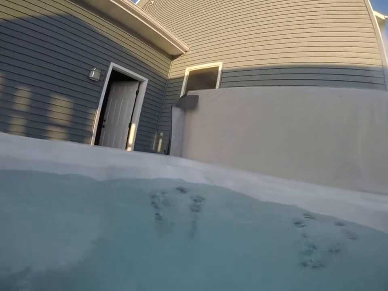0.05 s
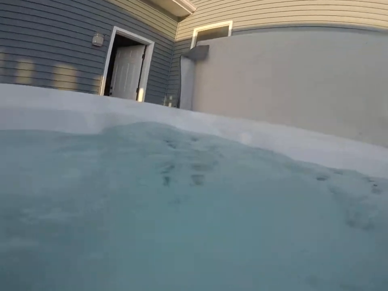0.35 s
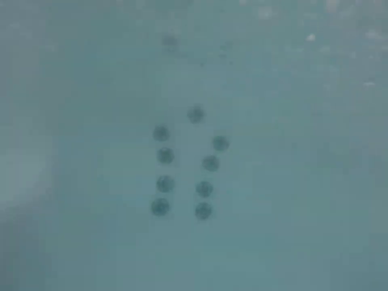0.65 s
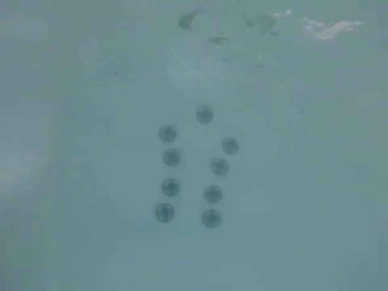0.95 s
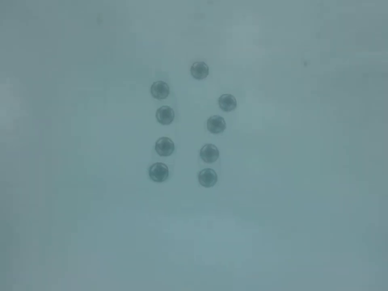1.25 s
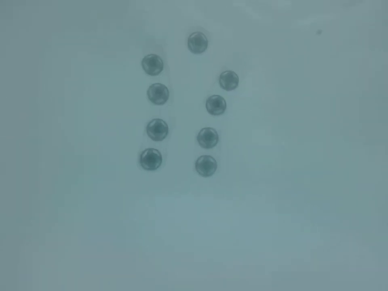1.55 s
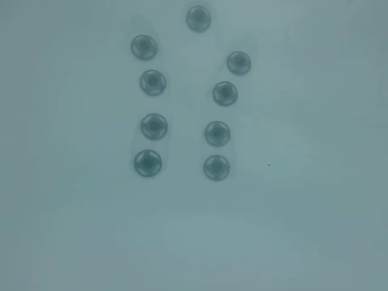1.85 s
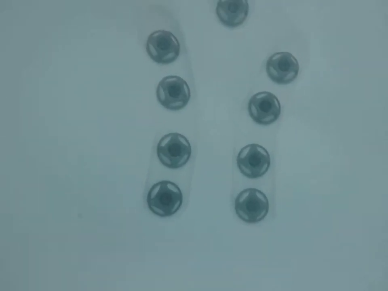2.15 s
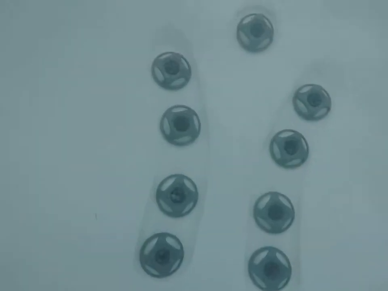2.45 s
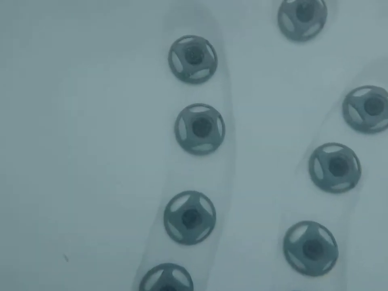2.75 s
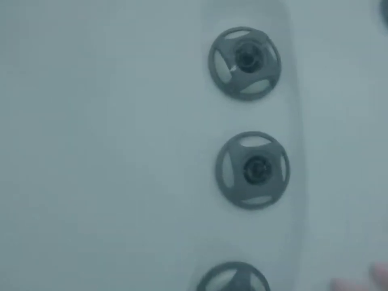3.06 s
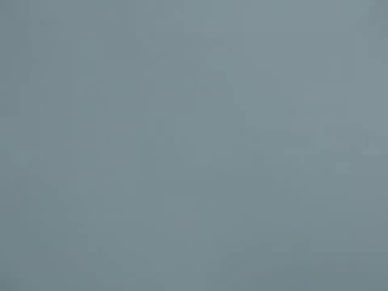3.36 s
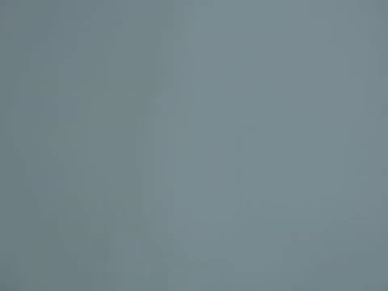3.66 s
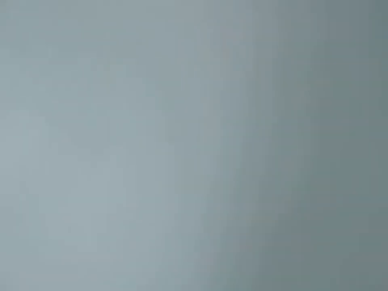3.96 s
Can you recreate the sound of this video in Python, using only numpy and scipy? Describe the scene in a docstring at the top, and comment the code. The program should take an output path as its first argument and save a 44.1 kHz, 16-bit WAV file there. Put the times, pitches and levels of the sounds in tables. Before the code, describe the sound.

A quick splash and bubbly knocks give way to a hot tub humming and rumbling underwater.

```python
"""A camera in a waterproof case dips into a hot tub. Over faint open air, jets and fizz come the first
ticks on the case, a low gulp and the pings of air bubbles breaking free. At 0.6 s the surface splashes
shut and the air is gone; drops and fingers knock and ping on the case among more bubbles. From about
1 s the pump hums through the water, and the jet rumble builds to the end as the camera nears the wall.
Fine fizz and a few last ringing clicks reach the microphone through the resonances of the case."""
import sys
import numpy as np
from scipy import signal
from scipy.fft import rfft, irfft, next_fast_len
from scipy.io import wavfile
from scipy.ndimage import uniform_filter1d, minimum_filter1d, map_coordinates

SR = 44100
rng = np.random.default_rng(int(sys.argv[2]) if len(sys.argv) > 2 else 0)


def dump_mix(stems):
    """Bounce the given channels to the path in sys.argv[1] as a 16-bit WAV at rate SR."""
    frames = np.atleast_2d(stems).T  # one column per channel
    limited = np.clip(frames, -1, 1)  # hard clip at full scale
    pcm = np.round(limited * 32767).astype(np.int16)
    wavfile.write(sys.argv[1], SR, pcm)


N = 176400
TOP_HZ = 16000

# EQ of the open air above the tub: f/Hz, gain/dB
AIR_EQ = [(150, -2.5), (400, -3), (1100, -9.5), (1800, -24), (2800, -8), (3600, -18), (4800, -13.5),
          (5600, -11.5), (8000, -23), (15000, -29.5)]

# fader ride of the jet rumble, before the trims: t/s, low level/dB, mid level/dB, high level/dB
JET_RIDE = [(0.0, -55.5, -70, -70), (0.43, -58.5, -78, -73.5), (0.86, -44.5, -68.5, -61.5),
            (1.15, -40.5, -55.5, -57), (1.63, -33.5, -54, -54), (1.97, -28, -45.5, -56.5),
            (2.18, -31.5, -50, -58), (2.48, -31, -50.5, -58), (3.19, -24.5, -38.5, -51.5),
            (3.34, -21, -37, -46), (3.59, -22.5, -34.5, -44), (4.0, -22.5, -30.5, -41)]
# trims of the low, mid and high rumble: gain/dB
JET_TRIMS = [-6.5, 3.5, -1]
# EQ of the low rumble: f/Hz, gain/dB
JET_LOW_EQ = [(30, -28), (65, -6), (100, 0), (150, -1), (200, -1), (250, -4.5), (310, -23), (500, -75.5)]
# EQ of the mid rumble: f/Hz, gain/dB
JET_MID_EQ = [(170, -47), (250, -12.5), (290, 0.5), (355, -2), (400, -9), (470, -20.5), (800, -69.5)]
# EQ of the high rumble: f/Hz, gain/dB
JET_HIGH_EQ = [(280, -32), (420, -0.5), (680, -0.5), (780, -9), (1100, -17), (1600, -33), (4000, -72)]
# ride of the water pushing on the case: t/s, level/dB
SWAY_RIDE = [(0.0, -51), (0.22, -38), (0.27, -50.5), (0.6, -38.5), (0.7, -48), (1.36, -49), (1.39, -35.5),
             (2.75, -50.5), (3.26, -42), (4.0, -40.5)]
# EQ of that push: f/Hz, gain/dB
SWAY_EQ = [(10, 2.5), (25, 4), (50, 0.5), (75, -5.5), (130, -29), (400, -64)]

# ride of the fizz, before the trims: t/s, body level/dB, hiss level/dB
FIZZ_RIDE = [(0.0, -63, -73), (0.34, -63, -70.5), (0.52, -57.5, -69), (0.66, -58.5, -77.5),
             (0.91, -51.5, -67.5), (1.06, -51, -70), (1.26, -51, -68), (1.68, -43.5, -61.5),
             (2.14, -45.5, -61), (3.11, -49.5, -61), (3.42, -52, -59.5), (4.0, -44.5, -57.5)]
BODY_TRIM_DB, HISS_TRIM_DB = -0.5, -1
# EQ of the midrange body of the fizz: f/Hz, gain/dB
BODY_EQ = [(600, -7), (1000, -6.5), (1400, -5.5), (1650, -0.5), (1850, -2.5), (2100, -0.5), (2500, -4.5),
           (2900, -9), (3400, -16), (4200, -21), (7000, -59)]
# EQ of the hiss on top: f/Hz, gain/dB
HISS_EQ = [(2400, -27), (3500, 5.5), (4350, -3.5), (4750, -1), (5900, -10.5), (6400, -12.5), (8400, -13.5),
           (10000, -19), (13000, -25.5), (16000, -35)]
# high case resonances in the hiss: f/Hz, width/Hz, level relative to the hiss/dB
HISS_RINGS = [(4360, 110, -7.5), (5530, 410, -6), (6320, 310, -12.5)]

# drops and fingers striking the case: t/s, level/dB, lowest excited f/Hz, highest excited f/Hz
KNOCKS = [(0.175, -37.5, 2500, 11700), (0.473, -38.5, 5030, 9800), (0.5673, -18, 1950, 13100),
          (0.5706, -8.5, 2200, 6770), (0.5801, -17, 513, 3000), (0.5754, -18.5, 6000, 13000),
          (0.5845, -21, 6000, 13000), (0.5915, -19.5, 5500, 9000), (.602, -28.5, 4020, 13800),
          (0.627, -28.5, 4400, 13060), (0.6392, -27.5, 2500, 5370), (.6672, -48, 4500, 9900),
          (.692, -41.5, 2200, 6960), (0.8373, -25, 900, 2550), (0.8898, -9.5, 4340, 7510),
          (0.9069, -3, 1990, 4170), (0.9082, -17, 3320, 7200), (0.942, -34.5, 4000, 7950),
          (0.963, -26, 590, 2200), (0.9751, -12, 1720, 7000), (0.977, -13, 3020, 7400),
          (0.9912, -26.5, 1970, 9000), (1.013, -46.5, 6030, 13000), (1.2258, -25.5, 1610, 2680),
          (1.687, -34, 3000, 12300), (2.21, -22, 1470, 4500), (3.535, -46, 6000, 12200),
          (3.572, -34, 3000, 5030), (3.6215, -35, 7400, 13100), (3.6403, -27, 2900, 5000),
          (3.8889, -7, 1780, 5870), (3.9333, -15.5, 1180, 2530), (3.9622, -11, 1600, 4440)]
# modes of the case: f/Hz, relative level/dB, t60/s
CASE_MODES = [(796, 17, 0.0079), (1660, 3, 0.017), (2194, 2, 0.011), (2990, 1.5, 0.0096), (3454, -8, 0.014),
              (3906, -10.5, 0.0078), (4680, -14, 0.01), (5490, 1, 0.0076), (6270, -1.5, 0.0069),
              (7240, -1, 0.0032), (9100, -11.5, 0.0047), (11340, -7.5, 0.011), (12500, -12, 0.0036)]
CRACK_DB, CRACK_T60_S, KNOCK_ATTACK_S = -8, 0.0059, 0.00012
SNAP_DB, THUD_DB = -28, -22  # relative to the event that sets them off
THUD_HZ, THUD_SWELL_S = 345, 0.00044

# large, slow pockets of air and water: t/s, f/Hz, envelope peak/dB, swell/s
GULPS = [(0.179, 45, -34.5, 0.016), (0.578, 70, -25, 0.0042), (0.641, 75, -38, 0.004),
         (.836, 250, -25, 0.0006), (1.071, 76, -27, 0.0056), (1.2887, 306, -11.5, 0.0048),
         (1.291, 560, -31, 0.0016), (1.335, 318, -23.5, 0.0023), (1.901, 736, -26, 0.0017),
         (3.179, 81.5, -17, 0.011), (3.795, 286.4, -16, 0.015)]
# swarms of tiny bubbles: t/s, length/s, rate/(bubbles a second), base level/dB, centre f/Hz
SWARMS = [(.28, .28, 170, -54.5, 4137), (.57, 0.048, 2600, -31, 3100), (0.615, 0.089, 160, -46.5, 2720),
          (0.82, 0.41, 70, -50.5, 2320), (0.92, 0.35, 40, -58, 4500), (2.7, 1.1, 14, -49, 4200)]
SWARM_SPREAD_OCT, SWARM_SCATTER_DB, SWARM_T60_CYCLES = 0.885, 3, 22
# short pitched pings of air bubbles and of knocks and clicks on the case: t/s, f/Hz, level/dB, t60/s
PINGS = [(.3014, 1810, -43.5, 0.032), (0.316, 2740, -40.5, .02), (0.4401, 2770, -31, 0.014),
         (0.485, 2880, -42.5, .025), (.5805, 3270, -15, 0.0041), (.583, 4880, -9, 0.0038),
         (0.5852, 1800, -11, 0.014), (0.5886, 3060, -1, 0.0026), (.592, 2590, -3, 0.008),
         (0.603, 1460, -25, .04), (0.6055, 5400, -23, 0.0046), (.6078, 3500, -12.5, 0.011),
         (0.6123, 2220, -9, 0.0081), (0.613, 4300, -26, .011), (.6345, 3400, -35, 0.015),
         (0.6392, 1860, -7, 0.0087), (.645, 1780, -27.5, 0.038), (.6703, 2200, -35, .012),
         (.709, 1404, -25, 0.027), (.909, 1990, -20.5, 0.032), (0.965, 1060, -36, 0.025),
         (.981, 1620, -20, 0.0037), (1.033, 986, -33, 0.024), (1.137, 1720, -22, 0.033),
         (1.226, 1310, -25, 0.025), (1.243, 2860, -37.5, 0.017), (1.338, 1430, -36.5, 0.023),
         (1.4849, 1663, -30.5, 0.059), (1.535, 724, -39.5, 0.07), (1.899, 1818, -4.5, 0.013),
         (1.903, 1665, -23, 0.042), (2.21, 6350, -33, 0.0081), (3.653, 2163, -5.5, 0.0085),
         (3.889, 2260, -16, 0.0076), (3.889, 2880, -12, .006), (3.889, 5300, -7.5, 0.0057),
         (3.9624, 1604, -18.5, 0.023), (3.9628, 3990, -17.5, 0.0093)]
PING_ATTACK_CYCLES, PING_RISE = 1.43, 0.011  # soft start; relative pitch rise over one t60

# EQ of the spray: f/Hz, gain/dB
SPRAY_EQ = [(100, 4), (450, -8), (900, 1), (1700, 10.5), (3300, -6), (4300, -14), (6000, -13.5),
            (8000, -15.5), (12000, -25), (16000, -40.5)]
SPLASH_S, SPLASH_LENGTH_S, SPLASH_DB, SPLASH_FADE_DB = 0.579, 0.037, -22, 14.5
SPLASH_CLUMP_DB, SPLASH_CLUMPS_PER_S = 6, 500

# ride of the pump hum: t/s, level/dB
PUMP_RIDE = [(0, -93), (1.03, -51.5), (1.19, -41.5), (1.52, -32), (1.75, -31), (2.09, -26.5), (2.3, -27.5),
             (2.5, -30), (2.8, -27.5), (3.05, -27), (3.3, -34), (3.6, -29), (4, -28.5)]
PUMP_HZ, PUMP_DRIFT_HZ, PUMP_WAVER_DB = 120.2, 0.35, 1

# sweep of the climbing band of fizz: t/s, centre f/Hz, level/dB
CLIMB_SWEEP = [(0, 1899, -87.5), (1.4, 2046, -53), (2.3, 2180, -65), (2.8, 2505, -51), (3.2, 2853, -59),
               (4, 3610, -72.5)]
# ride of the resonance that the flow excites: t/s, level/dB
RING_RIDE = [(0, -80.5), (1.3, -66), (1.9, -52), (2.4, -47), (2.9, -63), (3.4, -56), (4, -55)]
FLUTTER_DB, FLUTTERS_PER_S = 2.5, 35  # both swell and sink with the churning flow


def amp(db):
    """Decibels to gain."""
    return 10 ** (np.asarray(db) / 20)


def unit(x):
    """Scale to rms 1."""
    return x / np.sqrt(np.mean(x ** 2) + 1e-20)


def curves(rows):
    """Automation: one value per sample for each column after the time."""
    times, *columns = np.transpose(rows)
    return [np.interp(np.arange(N) / SR, times, column) for column in columns]


def wobble(rate):
    """A smooth random modulator, rate knots a second."""
    knots = rng.standard_normal(int(N * rate / SR) + 4)
    return map_coordinates(knots, [np.arange(N) * rate / SR])


def filtered(x, response):
    """Filter x by a gain given as a function of frequency."""
    size = next_fast_len(len(x) + 8192)
    return irfft(rfft(x, size) * response(np.fft.rfftfreq(size, 1 / SR)), size)[:len(x)]


def noise(eq, grain_db=0):
    """Equalised noise of rms 1, made of pulses whose sizes scatter by grain_db."""
    pulses = rng.standard_normal(N) * amp(grain_db * rng.standard_normal(N))
    f, db = np.transpose(eq)
    return unit(filtered(pulses, lambda hz: amp(np.interp(np.log(hz + 1), np.log(f), db, right=-120))))


def resonance(hz, width_hz):
    """Narrow-band noise of rms 1 whose centre may move."""
    i, q = (filtered(rng.standard_normal(N), lambda f: 1 / (1 + (f / width_hz) ** 2)) for _ in range(2))
    phase = 2 * np.pi * np.cumsum(hz * np.ones(N)) / SR
    return unit(i * np.cos(phase) + q * np.sin(phase))


def add(track, start_s, sound):
    """Drop a sound onto the track at start_s."""
    part = track[round(start_s * SR):][:len(sound)]
    part += sound[:len(part)]


def open_air(level_db=-60.5, dive_s=0.6, fade_s=0.067):
    """A thin bed of open air, shut out as the camera goes under."""
    fade = np.clip(1 - (np.arange(N) / SR - dive_s) / fade_s, 0, 1)
    return amp(level_db) * fade * noise(AIR_EQ)


def jets():
    """Churning water rumbles in three bands, louder and brighter near the wall."""
    bands = zip(curves(JET_RIDE), JET_TRIMS, (JET_LOW_EQ, JET_MID_EQ, JET_HIGH_EQ))
    return sum(amp(level_db + trim_db + 2.02 * wobble(14)) * noise(eq) for level_db, trim_db, eq in bands)


def sway():
    """Sub-bass from water pushing against the case."""
    level_db, = curves(SWAY_RIDE)
    return amp(level_db) * noise(SWAY_EQ)


def fizz():
    """Countless tiny bubbles make a grainy body and a hiss that keeps the case ringing."""
    body_db, hiss_db = curves(FIZZ_RIDE)
    body = amp(body_db + BODY_TRIM_DB + 0.91 * wobble(25.02)) * noise(BODY_EQ, grain_db=5.5)
    hiss = noise(HISS_EQ, grain_db=6)
    rings = sum(amp(db) * resonance(hz, width_hz) for hz, width_hz, db in HISS_RINGS)
    return body + amp(hiss_db + HISS_TRIM_DB) * (hiss + rings)


def thud():
    """The dull push of a blow or a bubble on the wall of the case."""
    t = np.arange(SR // 20) / SR
    age = t / THUD_SWELL_S
    return amp(THUD_DB) * age * np.exp(1 - age) * np.sin(2 * np.pi * THUD_HZ * t)


def knocks():
    """Each contact cracks and rings the case in the band it excites, with a full-band snap and a thud."""
    out, t = np.zeros(N), np.arange(SR // 20) / SR
    attack = 1 - np.exp(-t / KNOCK_ATTACK_S)
    for start_s, db, low_hz, high_hz in KNOCKS:
        ring = np.zeros(len(t))
        for k, (hz, mode_db, t60) in enumerate(CASE_MODES):  # balance and tuning vary from hit to hit
            decay = amp(mode_db + rng.normal(0, 3.6) - 60 * t / t60)
            ring += (-1) ** k * decay * np.sin(2 * np.pi * hz * rng.normal(1, 0.023) * t)
        crack = rng.standard_normal(len(t)) * amp(CRACK_DB - 60 * t / CRACK_T60_S)
        contact_band = signal.butter(4, [low_hz, high_hz], 'band', fs=SR, output='sos')
        blow = signal.sosfilt(contact_band, (ring / np.abs(ring).max() + crack) * attack)
        snap = amp(SNAP_DB) * crack / np.abs(crack).max()
        add(out, start_s, amp(db) * (blow / np.abs(blow).max() + snap + thud()))
    return out


def gulps():
    """Big pockets of air and water swell and die within a few cycles."""
    out, t = np.zeros(N), np.arange(SR // 4) / SR
    for start_s, hz, db, swell_s in GULPS:
        age = (t / swell_s) ** 1.17
        add(out, start_s, amp(db) * age * np.exp(1 - age) * np.sin(2 * np.pi * hz * t))
    return out


def ping(hz, t60):
    """One tone swells within a cycle or two and rings out, bending slightly up in pitch."""
    t = np.arange(SR // 12) / SR
    attack = 1 - np.exp(-(t * hz / PING_ATTACK_CYCLES) ** 2)
    envelope = attack * amp(-60 * t / t60)
    cycles = np.cumsum(hz * (1 + PING_RISE * np.minimum(t / t60, 1))) / SR
    return envelope / envelope.max() * np.sin(2 * np.pi * cycles)


def swarms():
    """Tiny bubbles of random size crackle in the splash and trail off the case."""
    out = np.zeros(N)
    for start_s, length_s, rate, base_db, centre_hz in SWARMS:
        for place, pitch, chance in rng.random((int(length_s * rate), 3)):
            hz = centre_hz * 2 ** (SWARM_SPREAD_OCT * (2 * pitch - 1))
            db = base_db + SWARM_SCATTER_DB * min(-np.log(chance), 2)  # a few stand out
            add(out, start_s + length_s * place, amp(db) * ping(hz, SWARM_T60_CYCLES / hz))
    return out


def pings():
    """Air bubbles, and the ringing tones of knocks and clicks on the case, each over a thud."""
    out = np.zeros(N)
    for start_s, hz, db, t60 in PINGS:
        add(out, start_s, amp(db) * ping(hz, t60))
        add(out, start_s, amp(db) * thud())
    return out


def splash():
    """A short, clumpy crackle of spray as the surface closes over the case."""
    age = (np.arange(N) / SR - SPLASH_S) / SPLASH_LENGTH_S
    attack = np.clip(age * 20, 0, 1)
    decay = amp(-SPLASH_FADE_DB * np.maximum(age, 0) - 35 * np.maximum(age - 1, 0))  # choked tail
    clumps = amp(SPLASH_CLUMP_DB * wobble(SPLASH_CLUMPS_PER_S))
    return amp(SPLASH_DB) * attack * decay * unit(clumps * noise(SPRAY_EQ, grain_db=6.5))


def pump():
    """The motor hums at twice the mains frequency, carried by the water."""
    level_db, = curves(PUMP_RIDE)
    cycles = np.cumsum(PUMP_HZ + PUMP_DRIFT_HZ * wobble(2.874)) / SR
    return np.sqrt(2) * amp(level_db + PUMP_WAVER_DB * wobble(6.42)) * np.sin(2 * np.pi * cycles)


def climbing_fizz(width_hz=260):
    """A fluttering band of fizz sweeps upward as the wall nears."""
    centre_hz, level_db = curves(CLIMB_SWEEP)
    return amp(level_db + FLUTTER_DB * wobble(FLUTTERS_PER_S)) * resonance(centre_hz, width_hz)


def flow_ring(start_hz=1484, rise_hz_per_s=65, width_hz=70):
    """The flow keeps one resonance singing, its pitch creeping up."""
    level_db, = curves(RING_RIDE)
    centre_hz = start_hz + rise_hz_per_s * np.arange(N) / SR
    return amp(level_db + FLUTTER_DB * wobble(FLUTTERS_PER_S)) * resonance(centre_hz, width_hz)


def scene():
    """Air, one-shots and the underwater bed meet at one microphone inside the case."""
    air = open_air()
    one_shots = pings() + swarms() + gulps() + knocks() + splash()
    bed = pump() + jets() + sway() + fizz() + flow_ring() + climbing_fizz()
    return (air + one_shots + bed)[None]


def record(dry):
    """A fast limiter ducks the loudest peak; the camera keeps nothing above its band limit."""
    ceiling = 0.97
    needed_gain = ceiling / np.maximum(np.abs(dry[0]), ceiling)
    gain = uniform_filter1d(minimum_filter1d(needed_gain, size=65), size=65)
    band_limit = lambda hz: (hz < TOP_HZ) * np.cos(np.pi / 2 * np.minimum(hz / TOP_HZ, 1) ** 9)
    return filtered(dry[0] * gain, band_limit)[None]


dry = scene()
out = record(dry)
dump_mix(out)
```